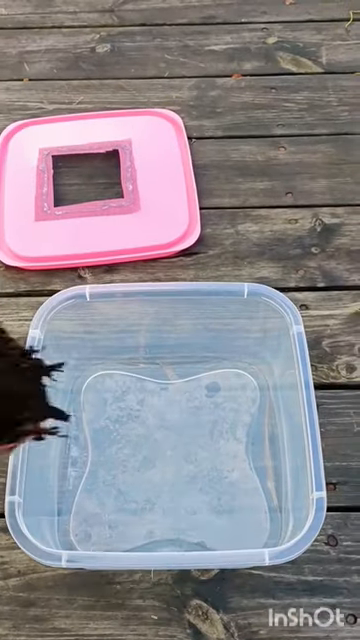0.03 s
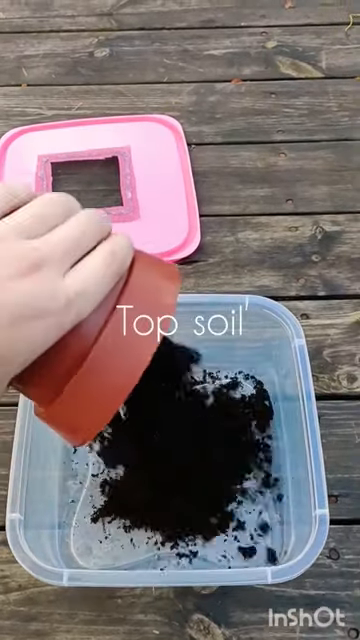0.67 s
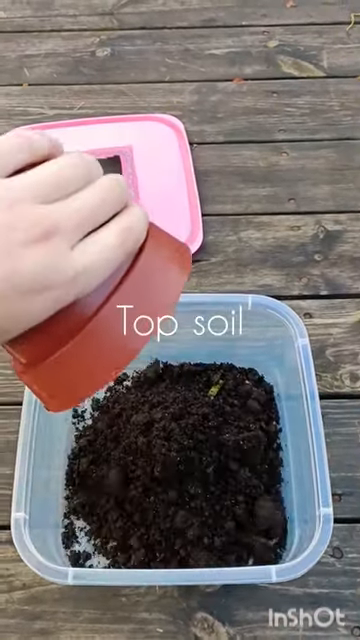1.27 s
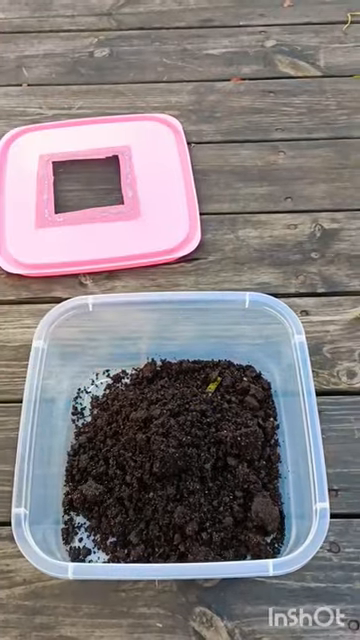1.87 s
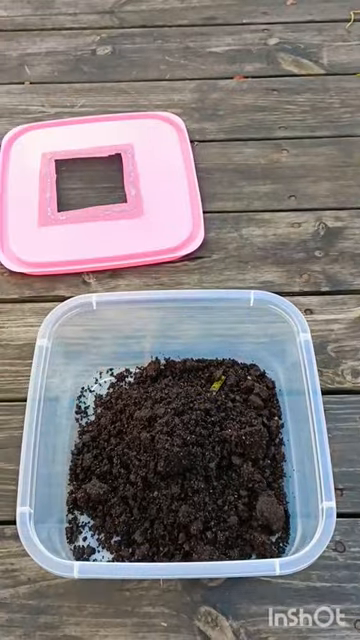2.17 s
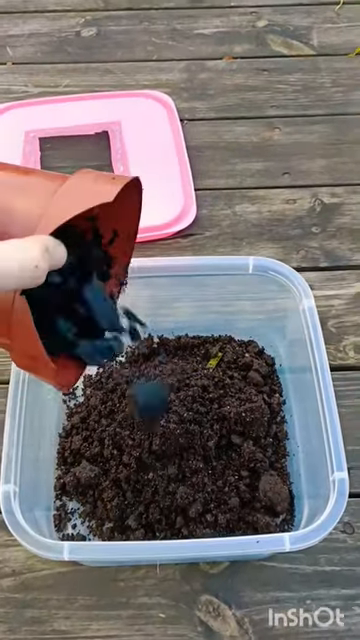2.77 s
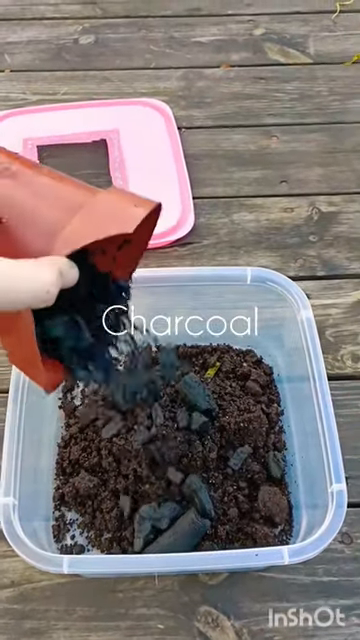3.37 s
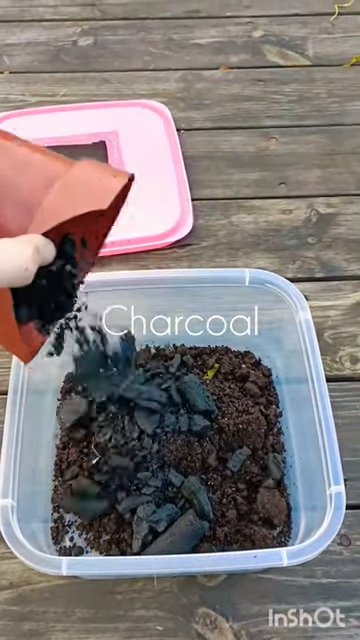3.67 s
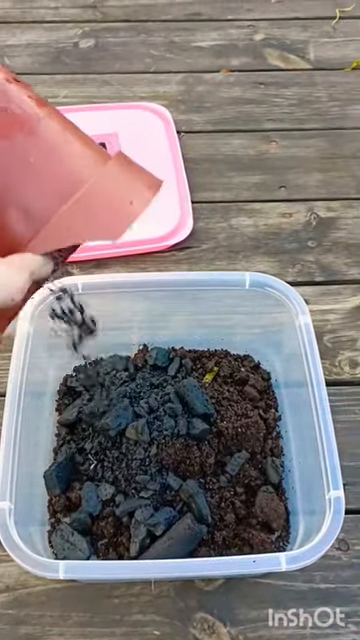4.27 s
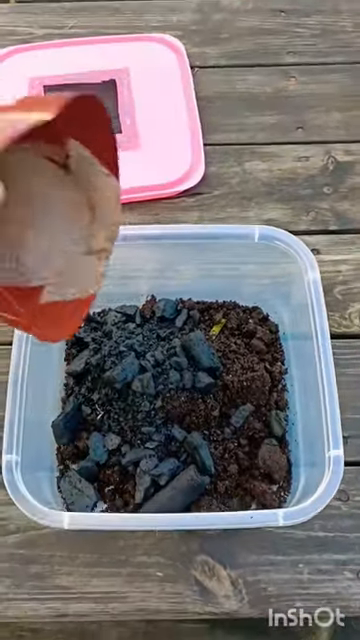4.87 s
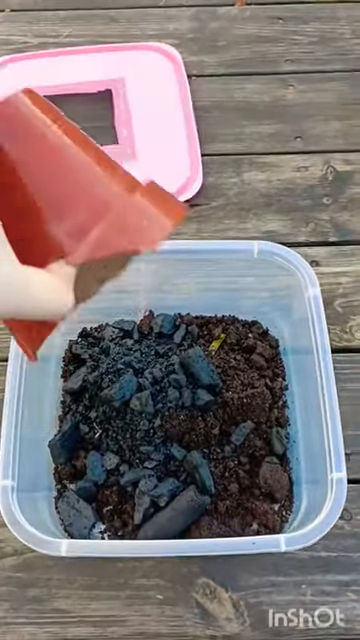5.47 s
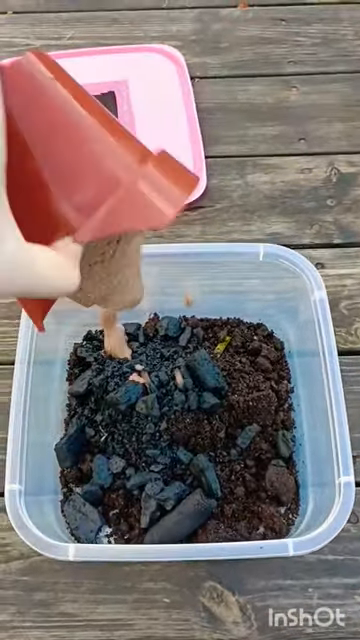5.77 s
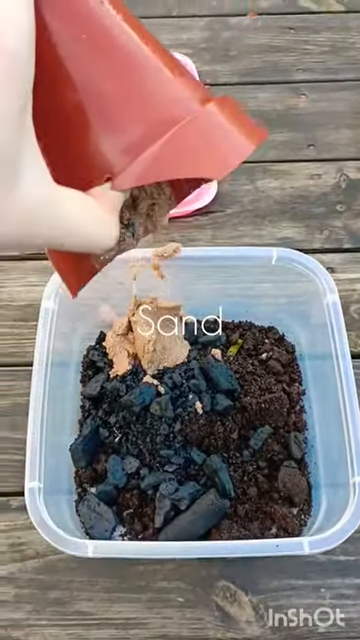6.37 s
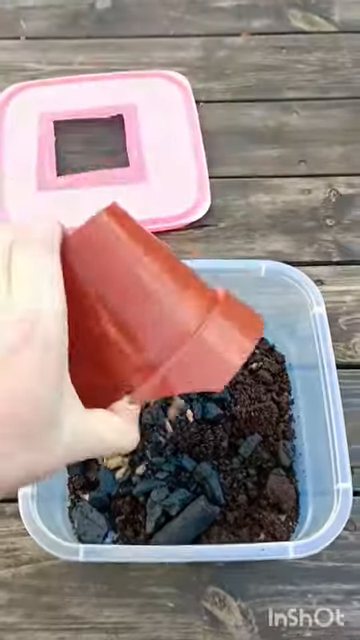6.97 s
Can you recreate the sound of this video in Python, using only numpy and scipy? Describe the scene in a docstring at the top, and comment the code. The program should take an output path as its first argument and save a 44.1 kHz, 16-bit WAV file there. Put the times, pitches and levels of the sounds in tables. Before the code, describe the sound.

Outdoors, over a faint wash, a far engine and a few tiny bird chirps, clods of soil drum loudly into a plastic tub while crumbs patter. Next comes a longer, quieter stream of rattling, clinking charcoal, and last a soft scrape and patter of damp sand. The sound drops out briefly between the pours, and a breeze and a handling bump rumble lightly on the microphone.

```python
"""Soil, then charcoal, then damp sand pour from a plastic pot into a plastic tub on wooden decking.
Clods thump the tub's floor, grit ticks on it, brittle charcoal slides and clinks, sand hisses and pats.
Each pour is a stream of tiny collisions that grows louder the faster the material runs.
Behind it lie a distant outdoor wash, a far engine, faint birds, a light breeze and a handling bump.
The whole sound drops out briefly between the pours."""
import sys
import numpy as np
from scipy import signal
from scipy.fft import rfft, irfft, next_fast_len
from scipy.io import wavfile

SR = 44100
rng = np.random.default_rng(int(sys.argv[2]) if len(sys.argv) > 2 else 0)


def file_out(sig):
    """Save sig as 16-bit WAV at sys.argv[1]."""
    # one column per channel
    cols = np.atleast_2d(sig).T
    # limit, then scale
    lim = np.clip(cols, -1, 1)
    pcm = np.round(lim * 32767).astype(np.int16)
    wavfile.write(sys.argv[1], SR, pcm)


N = 309582
TIME = np.arange(N) / SR
BRIEF = TIME[:SR // 5]   # time axis of one short sound

# Levels are relative: each layer applies further gains of its own.
# tone of the distant wash before and after the first drop-out: f/Hz, level/dB
EARLY_WASH_TONE = [(20, -9), (70, -6.5), (110, 0), (180, -2.5), (280, -10.5), (450, -7), (850, -2),
                   (1300, -10), (2300, -16), (4500, -28.5), (10000, -37), (14800, -33.5), (16000, -51.5)]
LATE_WASH_TONE = [(60, -21), (150, -2), (240, -4.5), (380, -2), (750, -4), (1000, 0), (1550, -11.5),
                  (2500, -10.5), (3400, -15), (5300, -15), (6500, -25), (12500, -24), (16000, -37.5)]
# loudness of those two washes: t/s, level/dB
EARLY_WASH_LEVEL = [(0, -37), (.3, -36.5), (.55, -38.5), (1.5, -40), (2, -40), (2.34, -39.5)]
LATE_WASH_LEVEL = [(2.36, -56), (4.7, -60), (5.1, -53), (5.6, -51.5), (6.4, -52.5), (6.8, -52), (7.02, -47)]
# hum of a far engine: t/s, f/Hz, level/dB
ENGINE_HUM = [(0, 52.4, -49), (.6, 52.2, -47), (1.2, 49.9, -41), (1.45, 48.5, -39.5), (1.9, 47.6, -39.5),
              (2.341, 47.8, -37)]
# faint bird chirps: t/s, f/Hz, level/dB
CHIRPS = [(.17, 4530, -47), (1.66, 3640, -47), (1.69, 4540, -45)]

# soil spills out as a few crumbs, the bulk, a trickle, a second shake: t/s, length/s, flow/dB
SOIL_SPILLS = [(.585, .01, -28), (.735, 0.094, 0.5), (.88, .17, -15.5), (1.17, 0.2, -13.5)]
# tones of falling clods, grit and crumbs: f/Hz, level/dB
CLOD_TONE = [(30, -33.5), (55, -18.5), (85, -2), (125, -2.5), (165, -8.5), (215, -11.5), (275, -1.5),
             (340, -2.5), (400, -1), (500, -0.5), (750, -5.5), (1100, -17), (1600, -33.5), (3000, -71.5)]
GRIT_TONE = [(500, -27), (1000, -28), (1500, -5), (1800, -11.5), (2180, 4.5), (2700, -16), (3500, -7.5),
             (7000, -22)]
CRUMB_TONE = [(1000, -2), (3000, -7), (5000, -9.5), (7500, -16.5), (11000, -14.5), (14500, -16),
              (16000, -14)]
# grit and hard lumps hit the plastic: t/s, level/dB, hardness/dB
GRIT_HITS = [(.626, -16, -16), (0.6653, -11.5, -16), (.7128, -14, -8), (0.7342, -9, -20), (0.7498, -9, -12),
             (.805, -14, -6), (.8184, -12.5, -24), (.8345, -11.5, -20), (0.9452, -11.5, -16.5),
             (1.165, -16.5, -14), (1.2115, -10, -17.5), (1.2777, -22.5, -8), (1.2894, -19, -12),
             (1.3564, -15.5, -16.5), (1.3792, -18.5, -19), (3.1534, -17, -9.5), (3.3471, -23.5, -8),
             (4.12, -20, -10)]
# modes (natural ringing notes) of the plastic under a small hit: f/Hz, level/dB, fade time/s
PLASTIC_MODES = [(957, -3, .03), (1780, 2, .0086), (2180, 5.5, 0.014), (2312, 5, .011), (2590, -9, 0.01),
                 (3230, -4, 0.0099), (4650, -6.5, 0.0056)]
# clods and lumps land in the tub: t/s, level/dB, treble cutoff f/Hz, ring level/dB
THUMPS = [(0.666, -20, 684, -6.5), (.696, -19, 400, -7), (0.7138, -9, 900, -12), (.728, -16.5, 504, 16),
          (.759, -14, 600, -34.5), (0.8085, -7.5, 1400, -0.5), (.835, -5.5, 810, 12.5),
          (.882, -12.5, 109, -19), (.917, -13.5, 160, -28), (0.9467, -6.5, 300, -20),
          (1.101, -20.5, 1510, -18.5), (1.166, -21, 513, 4.5), (1.221, -5, 450, -2.5),
          (1.273, -14, 400, 9.5), (1.2877, 2, 630, -15), (1.337, -21, 603, -11), (2.926, -31, 880, -9),
          (2.991, -23.5, 800, -29.5), (3.023, -27, 840, 0.5), (3.1542, -8, 1550, 8), (3.278, -29, 497, 3),
          (3.3474, -19.5, 935, 1), (3.674, -28.5, 814, 6), (3.875, -19, 1200, -4), (3.908, -19, 620, 15),
          (3.987, -29.5, 696, 16), (4.1197, -21.5, 1100, 7)]
# modes of the tub on the boards: f/Hz, level/dB, fade time/s
TUB_MODES = [(166, -4.5, 0.073), (368, -0.5, 0.065), (384, -8.5, 0.12), (440, -12.5, 0.1), (516, -1, 0.094),
             (613, 0, 0.055), (781, 1, 0.036), (919, 2.5, 0.045), (1230, -4, 0.024), (1500, -3.5, 0.026)]
# the bounce of the tub's floor sinks in pitch under the weight of the soil: t/s, f/Hz
FLOOR_BOUNCE = [(1.4, 270), (2.9, 122.4)]
# the loudest brittle pieces hit each other and the pot: t/s, level/dB, f/Hz, left minus right/dB
CLINKS = [(0.776, -20, 3420, -3), (1.0497, -31.5, 5530, -3), (1.1245, -32, 7040, 0),
          (1.4207, -32.5, 5640, -3), (2.7453, -40.5, 5300, 0), (2.81, -38.5, 3200, 3),
          (2.9265, -34.5, 3300, 0), (2.975, -36, 4260, 2), (3.022, -31, 2710, -1), (3.1166, -38, 2940, -3),
          (3.2488, -37, 3760, 1), (3.275, -37, 4280, -3), (3.4659, -37, 5470, 10), (3.661, -31, 2470, 3),
          (3.754, -34, 8070, -3), (3.77, -30, 4360, 5), (3.8346, -30.5, 8570, -2), (3.862, -29.5, 2820, -1),
          (3.878, -29.5, 3500, 3), (3.9236, -35, 9140, -2), (4.009, -40, 3880, -8), (4.055, -39.5, 2640, 2),
          (4.221, -37.5, 6000, -3), (4.273, -35.5, 8670, 1), (4.2793, -37, 2820, -2),
          (4.346, -35.5, 7570, -4), (4.396, -43, 12740, -7), (4.42, -34, 3840, -0.5),
          (4.4669, -40.5, 7500, -2), (4.589, -36.5, 11970, -7), (4.633, -45.5, 6430, -3)]

# low rumbles on the microphone from wind and a handling bump: t/s, length/s, level/dB
RUMBLES = [(3.65, 0.22, -42.5), (4.24, 0.022, -39), (4.6, 0.059, -45.5), (4.89, 0.04, -35),
           (5.09, 0.086, -45.5), (5.28, .07, -53), (5.77, 0.22, -58)]
# tone of those rumbles and of the light breeze: f/Hz, level/dB
RUMBLE_TONE = [(15, -10.5), (30, -3.5), (55, 4.5), (100, -4.5), (170, -14.5), (300, -26.5), (600, -80)]

# charcoal trickles as the pot tilts and empties: t/s, flow/dB
CHARCOAL_TRICKLE = [(2.55, -23.5), (2.8, -9.5), (3.1, -13.5), (3.3, -15), (3.55, -7), (3.95, -6),
                    (4.35, -12), (4.68, -21.5)]
# the charcoal heap gives way in small slides: t/s, length/s, flow/dB
CHARCOAL_SLIDES = [(2.9, 0.067, -17), (2.995, 0.011, -4.5), (3.37, 0.11, -10), (3.6, 0.08, -4),
                   (3.82, 0.1, -13.5), (4.21, 0.038, -7.5), (4.395, 0.027, -17)]
# tone of sliding charcoal: f/Hz, level/dB
CHARCOAL_TONE = [(250, -5.5), (500, -14), (800, 0), (1150, -7.5), (1750, -9), (2080, 0), (2750, -4.5),
                 (5500, -3.5), (7200, -10.5), (11000, -10), (14500, -6.5), (16000, -32)]

# damp sand slips along the pot in jerks: t/s, length/s, flow/dB
SAND_SLIPS = [(5.57, .04, -14.5), (5.75, 0.039, -7.5), (5.84, .01, -9.5), (5.92, 0.041, -4.5),
              (6.013, 0.0041, 1), (6.048, 0.064, -5), (6.14, 0.025, -1.5), (6.21, 0.068, -5.5),
              (6.445, 0.039, -17)]
# lumps of sand land: t/s, level/dB
SAND_PATS = [(6.015, -44), (6.065, -40.5), (6.172, -37.5), (6.229, -40.5), (6.262, -39.5)]
# tones of hissing sand and of its landing lumps: f/Hz, level/dB
SAND_TONE = [(400, 0), (900, -3.5), (2000, -1.5), (3000, -0.5), (4800, 0), (7000, -11), (10000, -5),
             (14000, -9), (16000, -39)]
PAT_TONE = [(50, -8), (115, 2), (190, -1.5), (235, -2), (310, 1), (500, -9.5), (900, -15), (2000, -28)]

# how alike the microphone's two openings sound: f/Hz, likeness (0 unrelated, 1 the same)
STEREO_LIKENESS = [(40, 0.76), (130, 0.97), (300, 1), (700, 0.42), (1500, 0.29), (3000, 0.061),
                   (6000, 0.12), (15000, 0)]
# which opening is louder: f/Hz, left minus right/dB
STEREO_BALANCE = [(60, 0), (200, 1), (380, -3.5), (650, -3), (1290, 1), (2300, 2), (4400, -4), (8100, 1.5),
                  (14000, -5.5)]
# two brief dips of the whole sound: t/s, level/dB
DROPOUTS = [(2.33, -9), (2.345, -49.5), (2.42, -16), (2.6, -0.5), (4.675, -2.5), (4.697, -41),
            (4.72, -17.5), (4.8, -7), (4.92, -1)]

CUTOFF_HZ = 15900   # top of the treble
CLOD_DB, GRIT_DB, CRUMB_DB = -17, -28, -30.5   # soil at full flow (0 dB)
SLIDING_DB, LANDING_DB = -35, -43   # charcoal at full flow
CHIPS_PER_S, CHIP_DB, CHIP_HZ = 30, -47, 5630   # small clinks: rate at full flow, typical level, pitch
POT_HZ, POT_WIDTH_HZ, POT_DB = 2035, 250, -5   # the ring of the pot's wall
FALL_S, CUSHION_DB_PER_S = 0.011, 5   # drop from rim to heap; landings soften as the heap grows
SLIP_DB, SPRAY_DB = -41, -16   # sand slipping; loose grains thrown off by each lump


def from_db(db):
    """Turn decibels into a gain to multiply by."""
    return 10 ** (np.asarray(db) / 20)


def rms_one(x):
    """Scale so that the average strength (rms) is 1."""
    return x / np.sqrt(np.mean(x ** 2) + 1e-20)


def peak_one(x):
    """Scale so that the highest peak is 1."""
    return x / np.abs(x).max()


def level_curve(rows):
    """Join points (t/s, level/dB) into a gain that fades away before the first and after the last."""
    s, db = np.transpose(rows)
    outside_s = np.maximum(s[0] - TIME, 0) + np.maximum(TIME - s[-1], 0)
    return from_db(np.interp(TIME, s, db) - np.minimum(200 * outside_s, 120))


def swells(rows, rise_s, fall_s):
    """Gain of events (t/s, length/s, level/dB) that rise 20 dB per rise_s, hold, then fall likewise."""
    power = 1e-18
    for s, length, db in rows:
        away = np.maximum(s - TIME, 0) / rise_s + np.maximum(TIME - s - length, 0) / fall_s
        power = power + from_db(db - 20 * np.minimum(away, 10)) ** 2
    return np.sqrt(power)


def at_hz(points, hz):
    """Read between a table's rows, with every octave equally wide."""
    f, value = np.transpose(points)
    return np.interp(np.log(hz + 1e-9), np.log(f), value)


def add(out, s, sound):
    """Mix a short sound in at s seconds."""
    i = int(np.clip(s * SR, 0, out.shape[1] - 1))
    out[:, i:i + sound.shape[-1]] += sound[..., :out.shape[1] - i]


def colour(x, tone):
    """Give a sound a tone (f/Hz, level/dB) with a filter that never rings ahead of a hit."""
    size = 8192
    cepstrum = irfft(np.log(from_db(at_hz(tone, np.fft.rfftfreq(size, 1 / SR)))))
    cepstrum[1:size // 2] *= 2   # fold the late half onto the early half (minimum phase)
    cepstrum[size // 2 + 1:] = 0
    response = irfft(np.exp(rfft(cepstrum)))
    return signal.oaconvolve(x, response[None], axes=1)[:, :N]


def stereo(pair):
    """Two unrelated signals become left and right: alike in the bass, apart in the treble."""
    size = next_fast_len(pair.shape[1] + 512)
    a, b = rfft(pair, size)
    alike = np.clip(at_hz(STEREO_LIKENESS, np.fft.rfftfreq(size, 1 / SR)), -.99, .99)
    mid, side = a * np.sqrt((1 + alike) / 2), b * np.sqrt((1 - alike) / 2)
    return irfft([mid + side, mid - side], size)[:, :pair.shape[1]]


def noise(tone):
    """Steady stereo noise with the given tone, rms 1."""
    return rms_one(colour(stereo(rng.standard_normal((2, N))), tone))


def burst(t60):
    """A puff of noise that fades by 60 dB in t60 seconds."""
    return rng.standard_normal((2, len(BRIEF))) * from_db(-60 * BRIEF / t60)


def struck(modes, vary_db, apart):
    """A hit rings each mode with a random strength; `apart` puts left and right out of step."""
    hz, db, t60 = np.transpose(modes)[:, :, None]
    sign = (-1) ** np.arange(len(hz))[:, None]   # neighbouring modes swing against each other
    strength = sign * from_db(db + rng.normal(0, vary_db, hz.shape) - 60 * BRIEF / t60)
    shift = np.minimum(apart * hz / 1000, np.pi / 4) * sign
    phase = 2 * np.pi * hz * BRIEF
    return np.array([(strength * np.sin(phase + side * shift)).sum(0) for side in (1, -1)])


def grains(pour, tone, per_s, spread_db, grain_s, ring_db, dust_db):
    """Collisions of uneven size, each a crunch with a faint pitch, over a hiss of dust; rms 1 in a pour."""
    start, length = pour[0][0] - .1, pour[-1][0] - pour[0][0] + .5
    t = BRIEF[:int(grain_s * SR) + 2]
    shape = t * from_db(-70 * t / grain_s)   # the contact builds up, then dies
    chance = np.random.default_rng(rng.integers(1 << 30))
    stream, out = np.zeros((2, int(length * SR))), np.zeros((2, N))
    for k in range(int(per_s * length)):
        size = from_db(spread_db * min(chance.exponential(), 2.6))
        ring = np.sin(2 * np.pi * (chance.uniform(0, CUTOFF_HZ) * t + chance.random((2, 1))))
        crunch = chance.standard_normal((2, len(t))) + from_db(ring_db) * ring
        add(stream, (k + 2 * chance.random()) / per_s, size * shape * crunch)
    stream = rms_one(stream) + from_db(dust_db) * chance.standard_normal(stream.shape)
    add(out, start, rms_one(colour(stereo(stream), tone)[:, :stream.shape[1]]))
    return out


def distant_wash():
    """A soft outdoor rush from far away, quieter after the first drop-out."""
    early = level_curve(EARLY_WASH_LEVEL) * noise(EARLY_WASH_TONE)
    late = level_curve(LATE_WASH_LEVEL) * noise(LATE_WASH_TONE)
    return early + late


def engine():
    """A far engine hums one low note that sags in pitch and wavers in loudness."""
    s, hz, db = np.transpose(ENGINE_HUM)
    phase = 2 * np.pi * np.cumsum(np.interp(TIME, s, hz)) / SR
    waver_db = 5.4 * noise([(3, -10.5), (8, -6), (25, -47), (100, -82.5)])
    return level_curve(np.c_[s, db]) * np.sqrt(2) * np.sin(phase) * from_db(waver_db)


def birds():
    """Short whistles rise and fall far off, blurred by echoes."""
    out = np.zeros((2, N))
    arch = np.sin(np.pi * np.minimum(BRIEF / 0.055, 1))
    for s, hz, db in CHIRPS:
        whistle = arch * np.sin(2 * np.pi * np.cumsum(hz * (.92 + 0.082 * arch)) / SR)
        blurred = signal.fftconvolve(whistle[None], burst(t60=0.3))
        add(out, s, from_db(db) * peak_one(blurred))
    return out


def soil():
    """Clods drum on the tub, grit patters and fine crumbs rustle, all driven by the flow."""
    flow = swells(SOIL_SPILLS, rise_s=.04, fall_s=.059)
    drum = grains(SOIL_SPILLS, CLOD_TONE, per_s=220, spread_db=4, grain_s=.007,
                  ring_db=-36, dust_db=-14.5)
    patter = grains(SOIL_SPILLS, GRIT_TONE, per_s=300, spread_db=2, grain_s=.0043,
                    ring_db=-1.5, dust_db=-10)
    rustle = grains(SOIL_SPILLS, CRUMB_TONE, per_s=550, spread_db=5.5, grain_s=.0037,
                    ring_db=-7, dust_db=-3.5)
    return (from_db(CLOD_DB) * flow * drum
            + from_db(GRIT_DB) * flow ** 0.93 * patter
            + from_db(CRUMB_DB) * flow ** 0.47 * rustle)   # a low power lets the crumbs linger


def grit():
    """Small stones make the plastic tick; the harder ones crack as well."""
    out = np.zeros((2, N))
    sharp = signal.butter(1, [1500, 6000], "band", fs=SR, output="sos")
    for s, db, hardness_db in GRIT_HITS:
        detune = np.exp(0.054 * rng.standard_normal())   # each spot has a slightly different pitch
        modes = [(hz * detune, level, t60) for hz, level, t60 in PLASTIC_MODES]
        tick = peak_one(struck(modes, vary_db=4.5, apart=0.059))
        crack = peak_one(signal.sosfilt(sharp, burst(t60=0.02)))
        add(out, s, from_db(db + 3) * peak_one(tick + from_db(hardness_db + 6.5) * crack))
    return out


def thumps():
    """A lump shoves the floor once, then the tub rings; soft clods dull the blow and smother the ring."""
    out = np.zeros((2, N))
    stiff = signal.butter(2, 85, "high", fs=SR, output="sos")   # the boards give little deep bass
    for s, db, cutoff_hz, ring_db in THUMPS:
        bounce_hz = np.interp(s, *np.transpose(FLOOR_BOUNCE))
        # the modes shift a little from spot to spot
        modes = [(hz * np.exp(0.039 * rng.standard_normal()), level, t60) for hz, level, t60 in TUB_MODES]
        ring = struck([(bounce_hz, -2, .13)] + modes, vary_db=3, apart=0.41)
        shove = struck([(367, 0, 0.0061)], vary_db=.1, apart=0.26)
        blow = peak_one(shove) + from_db(ring_db) * peak_one(ring)
        soft = signal.butter(2, cutoff_hz, fs=SR, output="sos")
        thump = signal.sosfilt(np.vstack([soft, stiff]), blow)
        add(out, s, from_db(db + 2.5) * peak_one(thump))
    return out


def clinks(pieces):
    """Each brittle piece crunches for a moment where it hits and rings with six modes of its own."""
    out = np.zeros((2, N))
    bite = 1 - np.exp(-BRIEF / .001)   # the contact builds up as the edge crumbles
    for s, db, hz, pan_db in pieces:
        pitches = np.minimum(hz * np.exp(rng.normal(0, 0.56, 6)), CUTOFF_HZ)
        ring = struck([(f, 0, .016) for f in pitches], vary_db=6.5, apart=0.27)
        edges_hz = [min(hz * 0.29, SR / 5), min(hz * 1.71, SR / 2.6)]
        band = signal.butter(2, edges_hz, "band", fs=SR, output="sos")
        snap = burst(t60=.015 * (4000 / hz) ** 0.68)   # higher snaps are shorter
        crunch = bite * (signal.sosfilt(band, snap) + from_db(-29) * snap)
        clink = rms_one(crunch) + from_db(-2) * rms_one(ring)
        bright_db = 3.5 * np.log2(max(hz / 4000, 1))   # bright snaps peak higher than dull crunches
        pan = from_db([[pan_db / 2], [-pan_db / 2]])
        add(out, s, from_db(db + 14 + bright_db) * peak_one(clink) * pan)
    return out


def rumbles():
    """Wind and a handling bump make low rumbles on the microphone, more on the left."""
    breeze = from_db(-54) * (TIME > 1.9)
    surges = swells(RUMBLES, rise_s=.12, fall_s=.072)
    return (breeze + surges) * noise(RUMBLE_TONE) * from_db([[1.5], [-2.5]])


def charcoal_flow():
    """How fast the charcoal runs: a trickle with slides on top."""
    return level_curve(CHARCOAL_TRICKLE) + swells(CHARCOAL_SLIDES, rise_s=.032, fall_s=.029)


def charcoal():
    """Chips slide out over each other, make the pot ring and land on the cushion of soil."""
    flow = charcoal_flow()
    scrape = grains(CHARCOAL_TRICKLE, CHARCOAL_TONE, per_s=300, spread_db=5.5, grain_s=.008,
                    ring_db=-6, dust_db=-8)
    rattle = from_db(SLIDING_DB) * flow * scrape
    pot_ring = signal.lfilter(*signal.iirpeak(POT_HZ, POT_HZ / POT_WIDTH_HZ, fs=SR), rattle)
    cushion = from_db(-CUSHION_DB_PER_S * np.maximum(TIME - CHARCOAL_SLIDES[0][0], 0))
    landing = cushion * np.interp(TIME - FALL_S, TIME, flow) ** 0.71
    thuds = grains(CHARCOAL_TRICKLE, CLOD_TONE, per_s=120, spread_db=3.5, grain_s=.013,
                   ring_db=-25, dust_db=-14)
    return rattle + from_db(POT_DB) * pot_ring + from_db(LANDING_DB) * landing * thuds


def chips():
    """Small chips clink at random, more often the faster the charcoal runs; gives rows like CLINKS."""
    s = np.flatnonzero(rng.random(N) < CHIPS_PER_S * charcoal_flow() / SR) / SR
    chance = np.random.default_rng(rng.integers(1 << 30))
    size, pitch, side = chance.standard_normal((len(s), 3)).T
    return list(zip(s, CHIP_DB + 2 * size, CHIP_HZ * np.exp(.35 * pitch), 4 * side))


def sand():
    """Damp sand scrapes along the pot and falls in soft pats that spray loose grains."""
    slipping = swells(SAND_SLIPS, rise_s=.032, fall_s=.027)
    landing = swells([(s, .0054, db) for s, db in SAND_PATS], rise_s=.018, fall_s=.039)
    loose = np.hypot(from_db(SLIP_DB) * slipping, from_db(SPRAY_DB) * landing)
    pats = grains(SAND_PATS, PAT_TONE, per_s=110, spread_db=2, grain_s=.025, ring_db=-30, dust_db=-14)
    hiss = grains(SAND_SLIPS, SAND_TONE, per_s=400, spread_db=2.5, grain_s=.005, ring_db=-7, dust_db=.5)
    return landing * pats + loose * hiss


def scene():
    """Three pours, with a short echo from the tub's walls, in the open air."""
    pours = thumps() + grit() + clinks(CLINKS + chips()) + soil() + charcoal() + sand()
    scatter = burst(t60=0.083) * (BRIEF > .002)
    walls = rms_one(stereo(scatter)) / np.sqrt(len(BRIEF))
    echo = signal.oaconvolve(pours, walls, axes=1)[:, :N]
    return pours + from_db(-8) * echo + distant_wash() + engine() + rumbles() + birds()


def record(dry):
    """Left and right each get their own tone; the level drops out twice; the highest treble is cut."""
    left = colour(dry[:1], [(hz, db / 2) for hz, db in STEREO_BALANCE])
    right = colour(dry[1:], [(hz, -db / 2) for hz, db in STEREO_BALANCE])
    dips = from_db(np.interp(TIME, *np.transpose(DROPOUTS)))
    treble_cut = signal.ellip(10, .1, 80, CUTOFF_HZ, fs=SR, output="sos")
    return signal.sosfilt(treble_cut, np.vstack([left, right]) * dips)


dry = scene()
out = record(dry)
file_out(out)
```